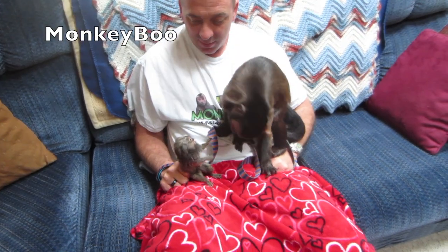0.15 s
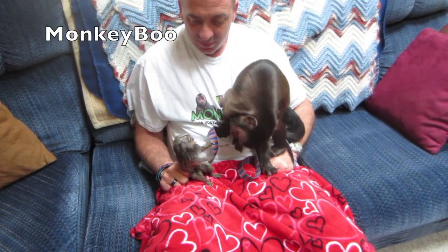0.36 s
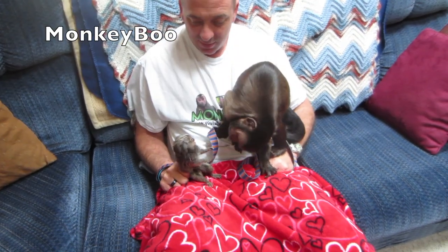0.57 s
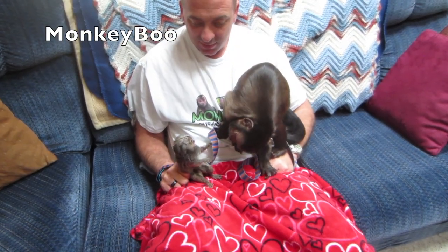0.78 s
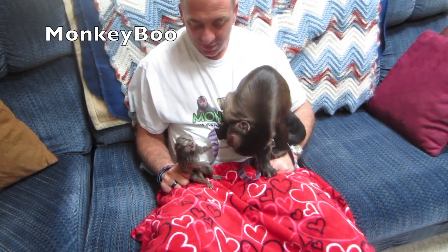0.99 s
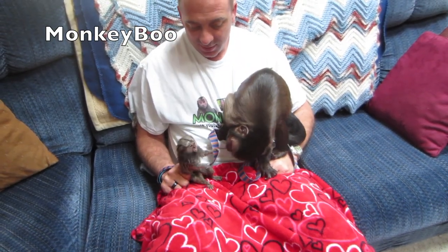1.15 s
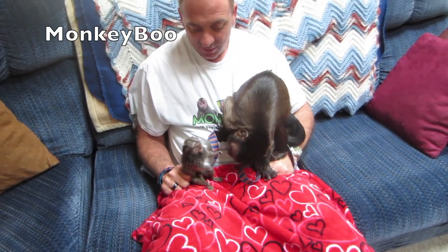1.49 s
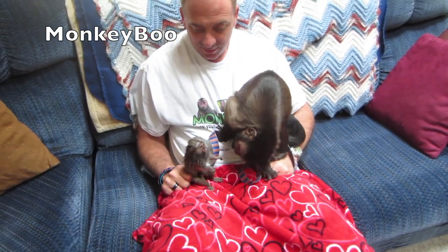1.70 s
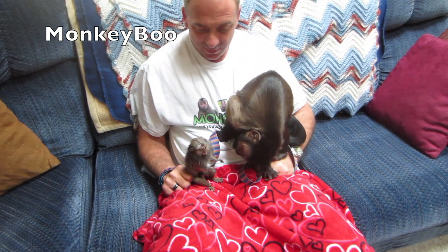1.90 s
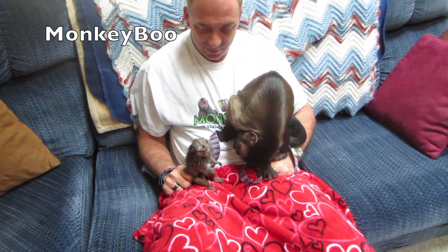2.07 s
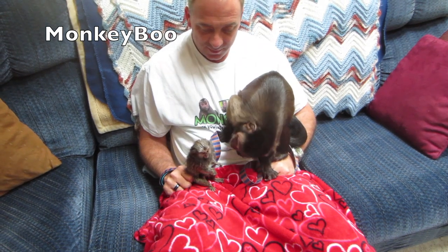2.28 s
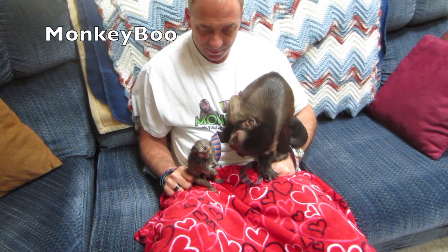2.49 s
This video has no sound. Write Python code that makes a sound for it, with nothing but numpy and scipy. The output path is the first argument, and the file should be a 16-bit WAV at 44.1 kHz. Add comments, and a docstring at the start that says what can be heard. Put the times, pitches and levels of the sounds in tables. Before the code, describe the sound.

Small monkey calls: five clicking chirps, then a piercing whistle with a slowing trill, indoors

```python
"""A marmoset gives five sharp chirps, then one loud trilled whistle, in a quiet living room.
A chirp is a fast falling tone breaking into throat pulses, a hollow pop and a hoarse puff; the first has no tone.
The whistle is a near-pure tone; its trill slows and widens as it sinks and fades.
Wavering tones give a faint echo of an earlier call at the start and a faint high tone near the end.
Filtered noise as reverberation, mains hum and soft room noise surround all."""
import sys
import numpy as np
from scipy import signal
from scipy.fft import rfft, irfft
from scipy.io import wavfile
from scipy.ndimage import uniform_filter1d

SR = 44100
rng = np.random.default_rng(int(sys.argv[2]) if len(sys.argv) > 2 else 0)


def log_audio(samples):
    """Write samples as a 16-bit WAV file to the path given in sys.argv[1]."""
    # one column per channel
    frames = np.atleast_2d(samples).T
    # limit to full scale, then quantise
    limited = np.clip(frames, -1, 1)
    pcm = np.round(limited * 32767).astype(np.int16)
    wavfile.write(sys.argv[1], SR, pcm)


N = 116865
T = np.arange(N) / SR
PULSE_GAP_S = 0.0018
PUFF_RISE_S = 0.003
THIN_OCTAVE_DB = -35  # octave of whistle and faint tones, re fundamental


def from_db(db):
    """Decibels to amplitude gain."""
    return 10 ** (np.asarray(db) / 20)


def at_hz(points, hz):
    """Interpolate (Hz, value) points on a log-frequency axis."""
    point_hz, values = np.transpose(points)
    return np.interp(np.log(np.maximum(hz, 1)), np.log(point_hz), values)


def in_time(rows):
    """Interpolate each column against the first, seconds, at every sample."""
    times_s, *columns = np.transpose(rows)
    return [np.interp(T, times_s, column) for column in columns]


def gate(start_s, end_s, rise_s, fall_s):
    """Smooth attack, hold and release."""
    rise = np.clip((T - start_s) / rise_s, 0, 1)
    fall = np.clip((end_s - T) / fall_s, 0, 1)
    return np.sin(np.pi / 2 * rise * fall) ** 2


def burst(middle_of_rise_s, hold_s, fade_s):
    """Quick linear rise, hold and exponential fade."""
    rise = np.clip((T - middle_of_rise_s) / PUFF_RISE_S + 0.5, 0, 1)
    return rise * np.exp(-np.maximum(T - middle_of_rise_s - hold_s, 0) / fade_s)


def noise(spectrum):
    """White noise shaped by (Hz, dB) points, scaled to rms 1."""
    gain = from_db(at_hz(spectrum, np.fft.rfftfreq(N, 1 / SR)))
    x = irfft(rfft(rng.standard_normal(N)) * gain, N)
    return x / x.std()


def waver(size=60):
    """Smoothed random fluctuation of standard deviation 1; size in samples."""
    x = uniform_filter1d(uniform_filter1d(rng.standard_normal(N), size), size)
    return x / x.std()


def ring(clicks, hz, width_hz):
    """Two-pole resonance: a unit click starts a decaying sine of nominal height 1."""
    radius = np.exp(-np.pi * width_hz / SR)
    angle = 2 * np.pi * hz / SR
    feedback = [1, -2 * radius * np.cos(angle), radius * radius]
    return signal.lfilter([0, np.sin(angle)], feedback, clicks + 1e-18)  # offset avoids denormals


def tone(hz, octave_db):
    """Sine of varying pitch with a weaker octave."""
    phase = 2 * np.pi * np.cumsum(hz) / SR
    return np.sin(phase) + from_db(octave_db) * np.sin(2 * phase)


def chirps():
    """Each tone falls ever faster, swells and pulses as it nears the throat resonance, then collapses."""
    # Falling tones. Each row: start in seconds, length in seconds, top Hz, end Hz,
    # level at the top in dB, level at the end in dB, pulsing depth 0-1.
    falling_tones = [(0.4182, 0.012, 10390, 5908, -26.5, -9, 0.84),
                     (0.7191, 0.013, 10400, 6400, -24, -7, 0.7), (0.8765, .0050, 7000, 6120, -31.5, -26, 0),
                     (1.0957, 0.014, 10430, 5494, -24, -15.5, 0.77)]
    fall_curve, fall_share, swell_curve = 1.7, 0.9, 3.0
    attack_s, release_s = 0.0036, 0.0012
    sink_hz_per_s = 240000  # pitch still sinks at the peak
    sag_hz_per_s, sag_db, sag_s = 560000, -24.5, 0.0051  # weak, steeper fall after the end
    octave_db, octave_fade_db = -22, -8.5
    out = np.zeros(N)
    for start, length, top_hz, end_hz, top_db, end_db, breaking in falling_tones:
        peak = start + length * fall_share
        end = start + length
        fall = np.clip((T - start) / (peak - start), 0, 1) ** fall_curve
        sink_hz = sink_hz_per_s * (np.clip(T, peak, end) - peak)
        sag_hz = sag_hz_per_s * np.clip(T - end, 0, sag_s)
        hz = top_hz + (end_hz - top_hz) * fall - sink_hz - sag_hz
        body = gate(start, end + release_s, attack_s, release_s)
        sag = from_db(sag_db) * gate(start, end + sag_s, attack_s, release_s)
        pulsing = 1 - breaking * fall * np.sin(np.pi * (T - end) / PULSE_GAP_S) ** 2
        swell = from_db(top_db + (end_db - top_db) * fall ** swell_curve)
        level = swell * np.maximum(body, sag) * pulsing
        out += level * tone(hz, octave_db + octave_fade_db * fall ** 2)
    return out


def rasps(count=9):
    """Throat pulses swell and fade through resonances, with a hollow pop and hoarse puff, all low-passed."""
    # Pulse bursts. Each row: middle in seconds, spread in seconds, pulse level in dB, throat resonance Hz,
    # its width Hz, puff level in dB, puff hold in seconds, pop level in dB, low-pass cutoff Hz.
    pulse_bursts = [(0.1394, 0.002, -18, 5460, 450, -41, 0.021, -54, 8070),
                    (0.4335, 0.0027, -17, 5740, 220, -41, 0.015, -46.5, 15500),
                    (0.7336, 0.00093, -10.5, 6050, 450, -41, .012, -43.5, 15400),
                    (0.8871, 0.002, -19.5, 5730, 500, -42.5, .026, -46, 10500),
                    (1.1095, 0.0039, -17, 5310, 200, -40.5, .018, -45.5, 15890)]
    # Other throat and mouth resonances. Each row: Hz, width in Hz, level in dB re throat.
    mouth = [(820, 250, -28.5), (3010, 404.5, -11), (4183, 500, -16), (9000, 2200, -9), (10600, 370, -22),
             (13185, 1800, -12.5)]
    # Puff spectrum. Each row: Hz, relative dB.
    puff_spectrum = [(250, -29), (480, -6), (800, 1.5), (1300, -3.5), (2000, -4.5), (3200, -2), (5200, 2),
                     (7000, -9), (9800, -8.5), (11500, -22), (13500, -22), (15500, -34.5)]
    puff_fade_s, puff_grain_db = 0.011, 2
    pop_hz, pop_width_hz, pop_delay_s, pop_fade_s = 828, 380, 0.00067, 0.008
    out = np.zeros(N)
    hoarse = noise(puff_spectrum) * from_db(puff_grain_db * waver())
    hollow = ring(rng.standard_normal(N), pop_hz, pop_width_hz)
    hollow /= hollow.std()
    for middle, spread, db, throat_hz, throat_width, puff_db, puff_s, pop_db, cutoff_hz in pulse_bursts:
        steps = np.arange(count) - count // 2 + 0.5
        lag_s = (steps + rng.normal(0, 0.036, count)) * PULSE_GAP_S
        pulses = np.zeros(N)
        pulses[((middle + lag_s) * SR).astype(int)] = from_db(db) * np.exp(-np.abs(lag_s) / spread)
        voice = ring(pulses, throat_hz, throat_width)
        for k, (hz, width_hz, gain_db) in enumerate(mouth):
            voice += (-1) ** k * from_db(gain_db) * ring(pulses, hz, width_hz)  # alternating polarity
        voice += from_db(puff_db) * hoarse * burst(middle, puff_s, puff_fade_s)
        voice += from_db(pop_db) * hollow * burst(middle + pop_delay_s, PUFF_RISE_S, pop_fade_s)
        lowpass = signal.butter(2, cutoff_hz, fs=SR, output="sos")
        out += signal.sosfilt(lowpass, voice)
    return out


def whistle():
    """Pitch swings up in pointed crests, weaker at each crest; returns direct sound and room send."""
    # Whistle course. Each row: time in seconds, lower pitch Hz, upward trill swing Hz,
    # level between crests in dB, room send in dB re direct.
    whistle_course = [(1.376, 8382, 480, -25, -11), (1.386, 8640, 490, -14.5, -21),
                      (1.405, 8650, 540, -13, -6), (1.48, 8567, 564, -10.5, -11),
                      (1.565, 8795, 814, -14, -7), (1.65, 8660, 1128, -18.5, -6.5),
                      (1.74, 8415, 1523, -21.5, -0.5), (1.79, 8152, 2035, -29.5, -3),
                      (1.835, 7846, 2390, -27, 1), (1.88, 7420, 2363, -28, -9),
                      (1.925, 7090, 3130, -29.5, 2.5), (1.955, 7050, 3750, -48, -11.5)]
    # Trill speed. Each row: time in seconds, swings per second.
    trill_rate = [(1.386, 28.4), (1.441, 26.2), (1.48, 24.5), (1.585, 23.5), (1.737, 22.5), (1.874, 21.4),
                  (1.92, 20.1)]
    start_s, end_s, edge_s, first_crest_s = 1.375, 1.958, 0.003, 1.386
    crest_sharpness, crest_dip_db, jitter_hz = 2, -8, 6
    low_hz, swing_hz, db, room_db = in_time(whistle_course)
    turns = np.cumsum(in_time(trill_rate)[0]) / SR
    turns -= np.interp(first_crest_s, T, turns)
    crest = np.abs(np.cos(np.pi * turns)) ** (2 * crest_sharpness)
    level = from_db(db + crest_dip_db * crest) * gate(start_s, end_s, edge_s, edge_s)
    voice = level * tone(low_hz + swing_hz * crest + jitter_hz * waver(), THIN_OCTAVE_DB)
    return voice, voice * from_db(room_db)


def faint_tones():
    """Echo of an earlier call at the start, a high tone near the end: tones whose pitch wavers at random."""
    # Faint tones. Each row: start in seconds, end in seconds, mean Hz, level in dB.
    tone_rows = [(-0.02, 0.06, 3270, -57), (-0.02, 0.066, 5680, -57.5), (2.329, 2.58, 5528, -79.5)]
    edge_s, rough_hz = 0.035, 411
    out = np.zeros(N)
    for start, end, hz, db in tone_rows:
        voice = tone(hz + rough_hz * waver(size=20), THIN_OCTAVE_DB)
        out += from_db(db) * gate(start, end, edge_s, edge_s) * voice
    return out


def room(x, count=10):
    """Convolve with delayed noise: strong early part, then a tail decaying band by band."""
    # Reverberation time. Each row: Hz, seconds to fall 60 dB.
    decay_times = [(500, 0.29), (1300, 0.61), (3500, .28), (5300, 0.46), (6400, 0.16), (7200, .38),
                   (9500, 0.34), (15000, 0.196)]
    delay_s, early_db, early_s = 0.00061, 10.5, 0.0029
    t = T[:SR // 2]
    white = rfft(rng.standard_normal(len(t)))
    hz = np.fft.rfftfreq(len(t), 1 / SR)
    centres_hz = np.geomspace(400, 16000, count)
    tail = np.zeros(len(t))
    for centre_hz, band in zip(centres_hz, np.eye(count)):
        band_noise = irfft(white * np.interp(hz, centres_hz, band), len(t))
        tail += band_noise * from_db(-60 * t / at_hz(decay_times, centre_hz))
    tail *= (t > delay_s) * from_db(early_db * np.exp(-t / early_s))
    return signal.fftconvolve(x, tail / np.sqrt(np.sum(tail ** 2)))[:N]  # unit energy


def background():
    """Steady sines for mains hum and a thin whine, plus shaped noise for the room."""
    # Hum and whine. Each row: Hz, level in dB rms.
    hum_tones = [(62.2, -55), (58.3, -67), (122, -70), (1584, -72)]
    # Room noise spectrum. Each row: Hz, relative dB per Hz.
    air_spectrum = [(20, -11.5), (50, -11.5), (90, -13.5), (140, -12.5), (210, -12), (320, -14), (600, -18),
                    (1000, -23), (1600, -24.5), (2600, -29), (4000, -37), (5600, -35), (8500, -38),
                    (10200, -49), (11600, -62), (16000, -63)]
    air_db_rms = -56
    hum = np.zeros(N)
    for hz, db in hum_tones:
        hum += np.sqrt(2) * from_db(db) * np.sin(2 * np.pi * (hz * T + rng.random()))
    return hum + from_db(air_db_rms) * noise(air_spectrum)


def scene():
    """Sum the calls, their reverberation and the quiet room; one channel."""
    chirp_room_db = -3.5
    calls = chirps() + rasps() + faint_tones()
    direct, to_room = whistle()
    reverberation = room(from_db(chirp_room_db) * calls + to_room)
    return (calls + direct + reverberation + background())[None]


def record(dry):
    """Steep elliptic low-pass cuts the top."""
    cutoff_hz = 15700
    lowpass = signal.ellip(12, 0.1, 80, cutoff_hz, fs=SR, output="sos")
    return signal.sosfilt(lowpass, dry)


dry = scene()
out = record(dry)
log_audio(out)
```